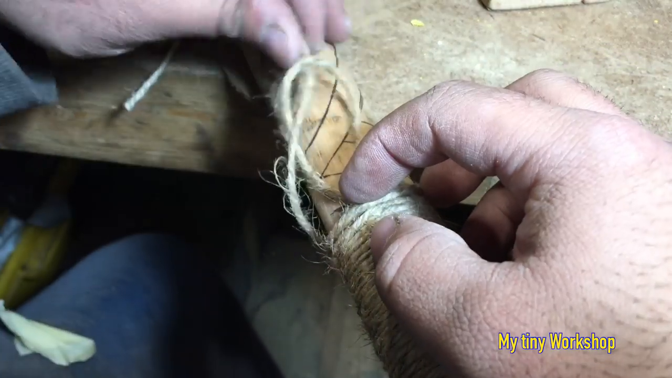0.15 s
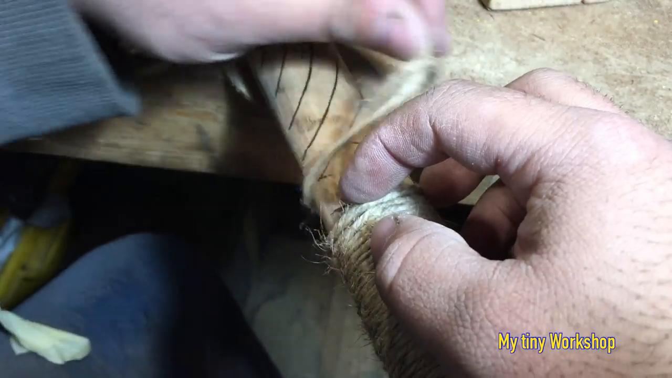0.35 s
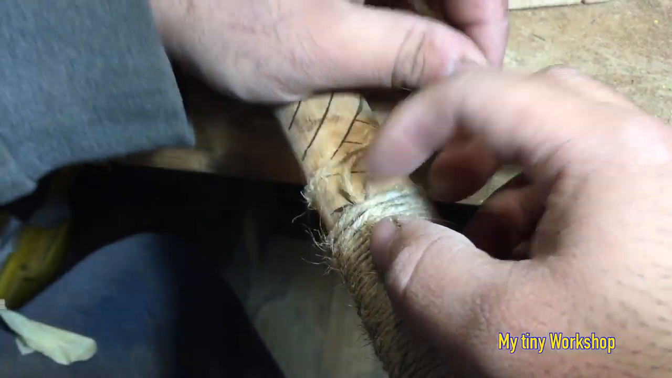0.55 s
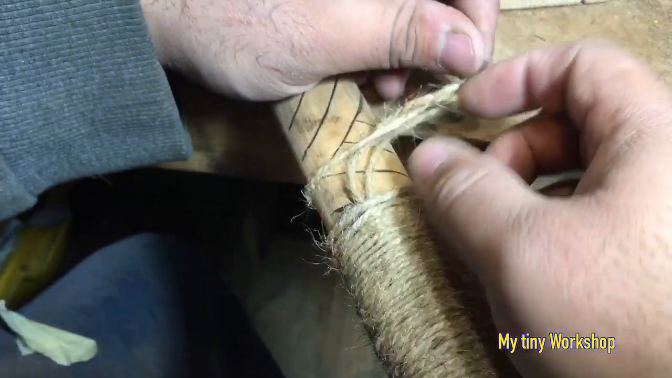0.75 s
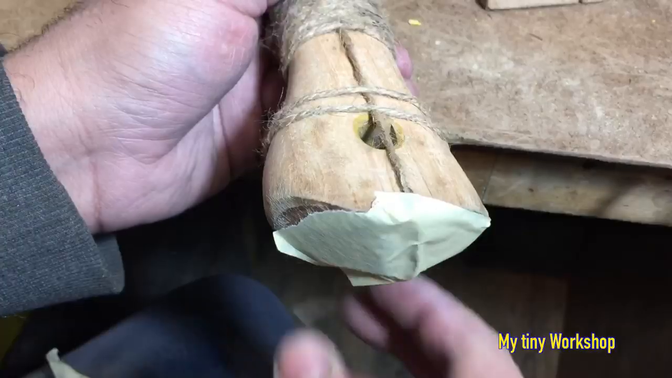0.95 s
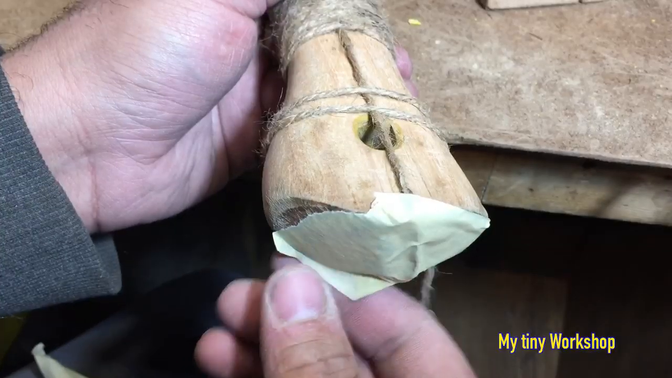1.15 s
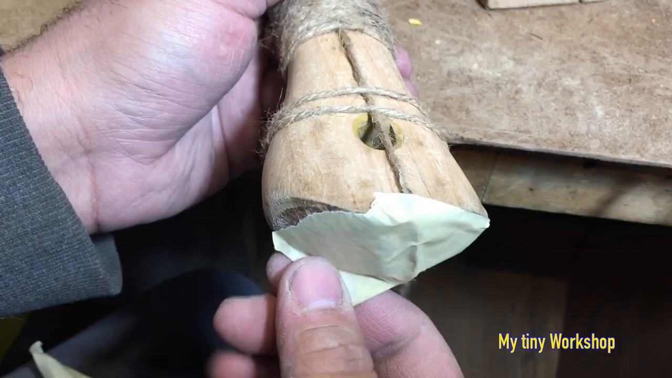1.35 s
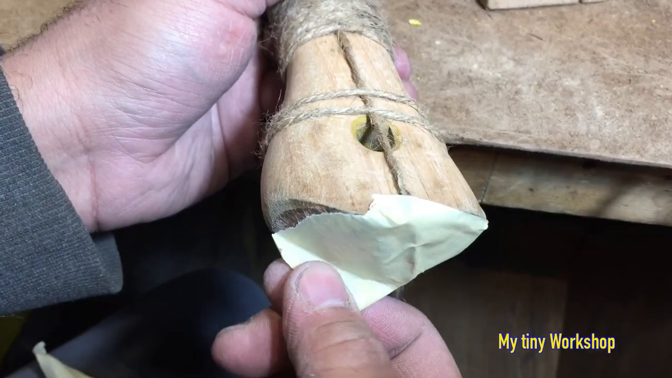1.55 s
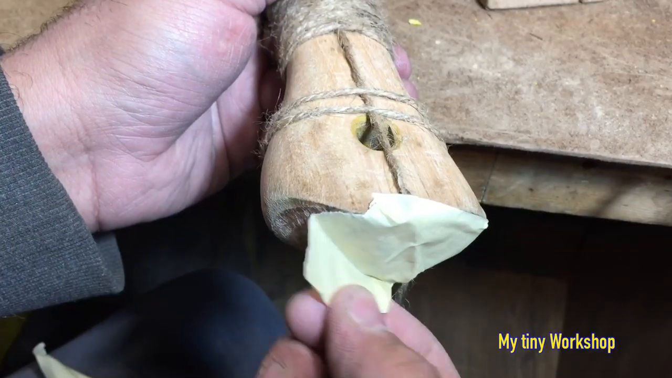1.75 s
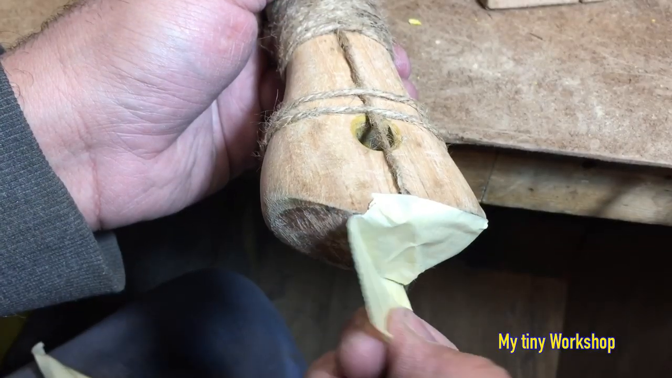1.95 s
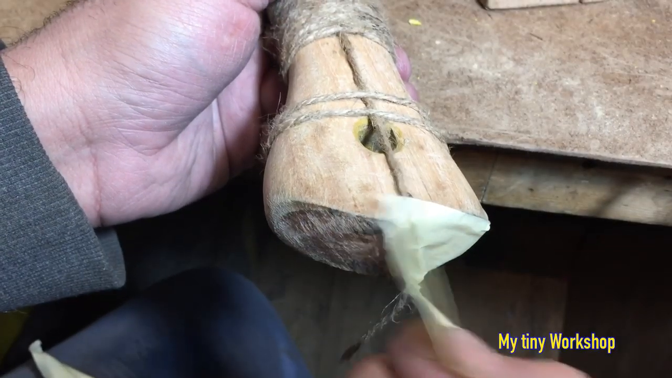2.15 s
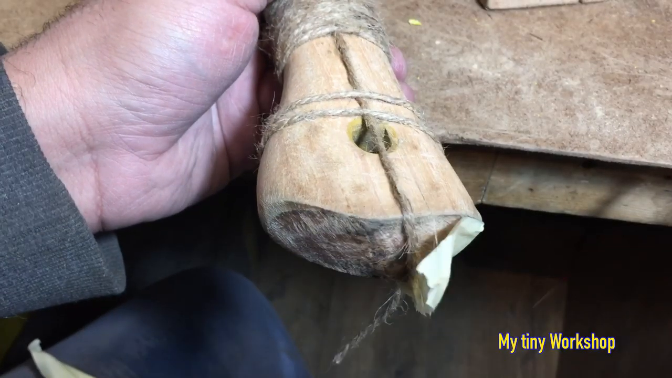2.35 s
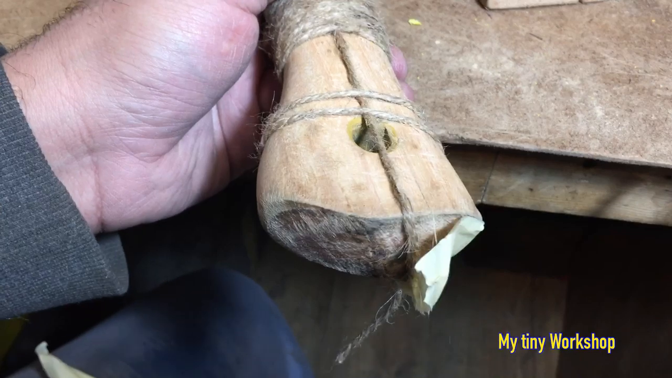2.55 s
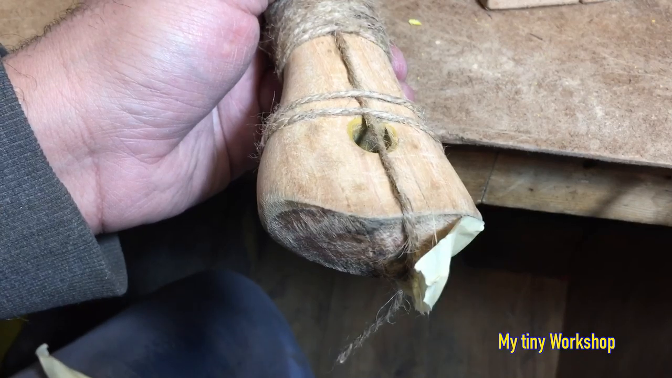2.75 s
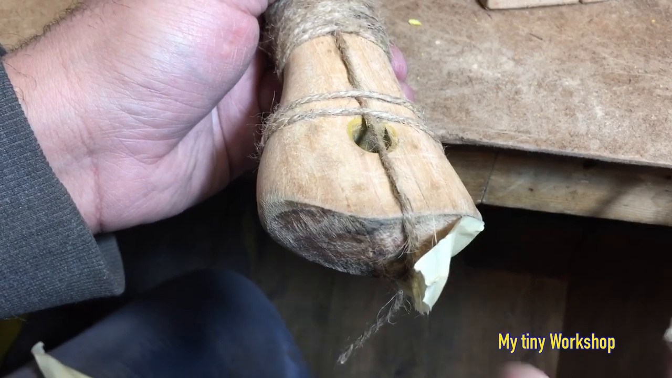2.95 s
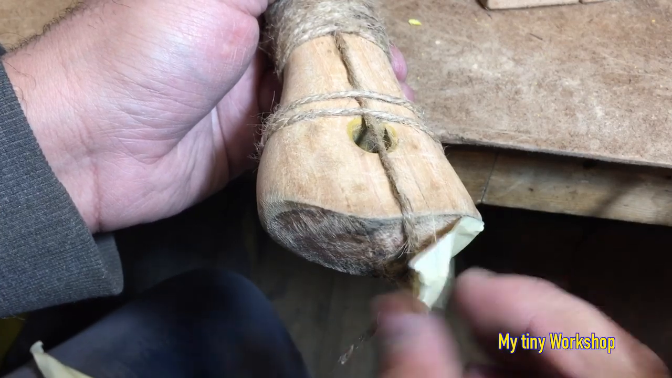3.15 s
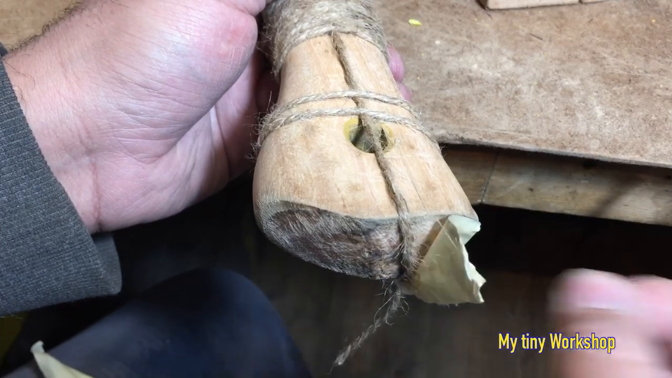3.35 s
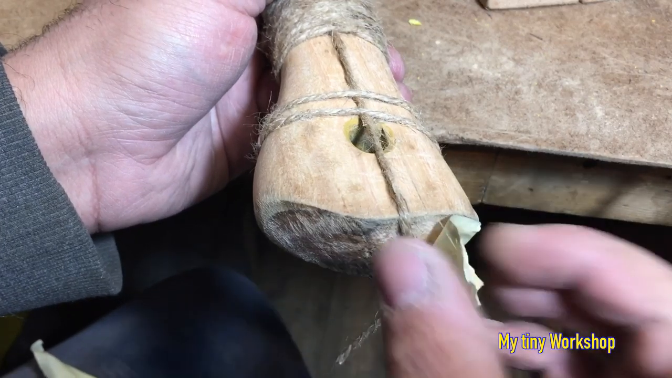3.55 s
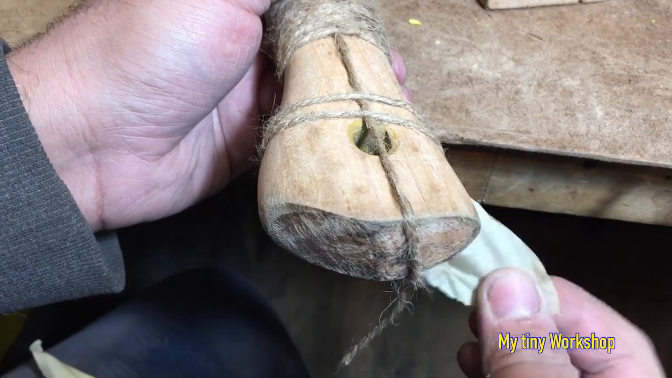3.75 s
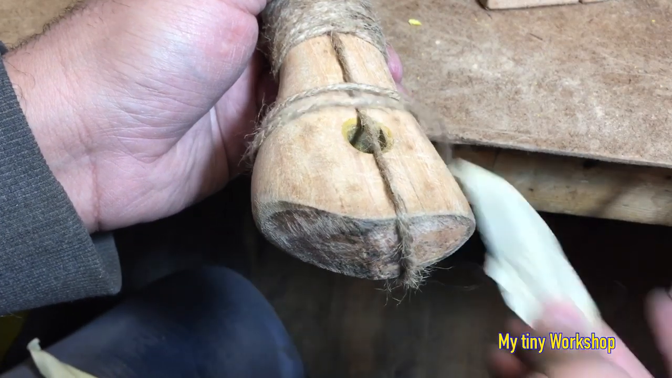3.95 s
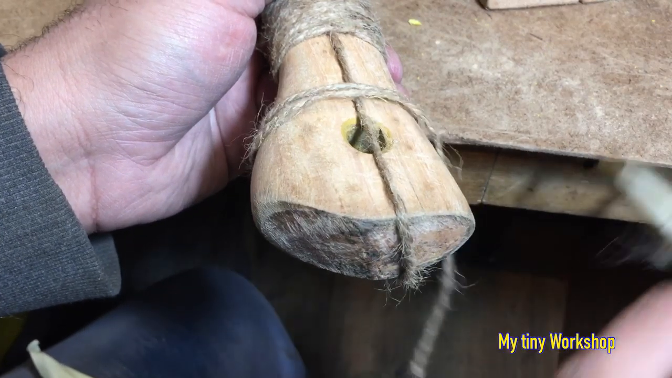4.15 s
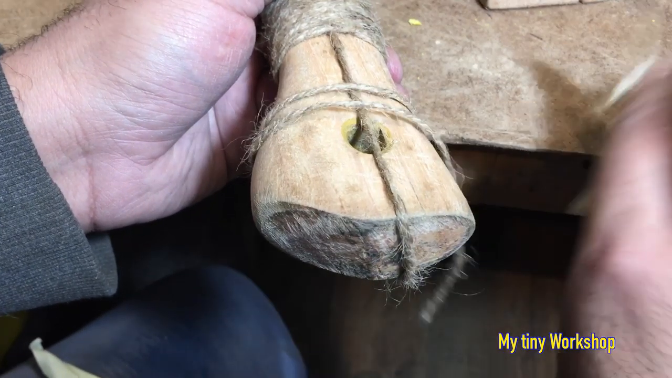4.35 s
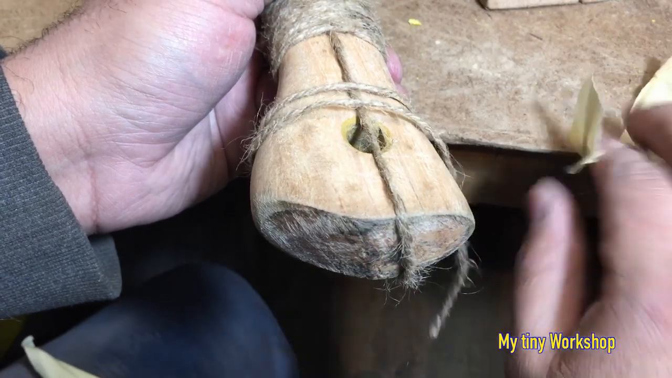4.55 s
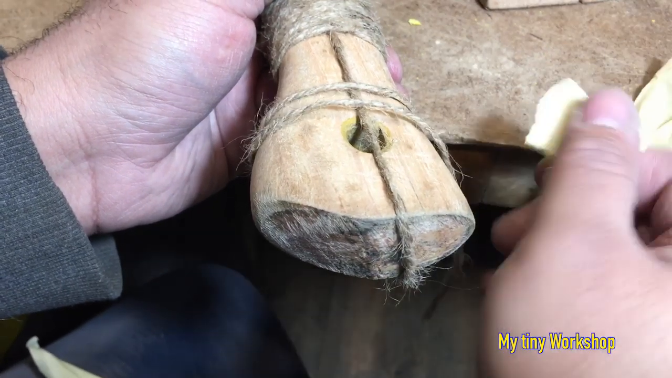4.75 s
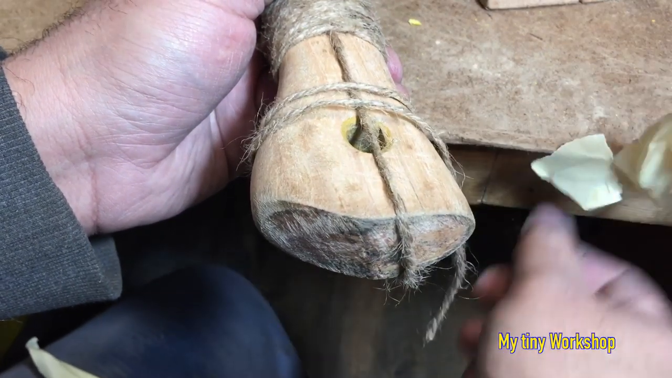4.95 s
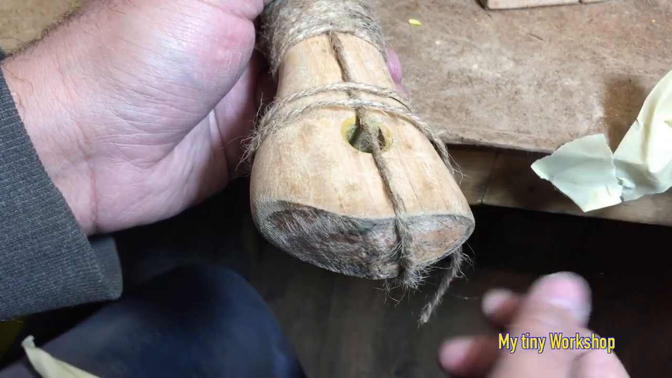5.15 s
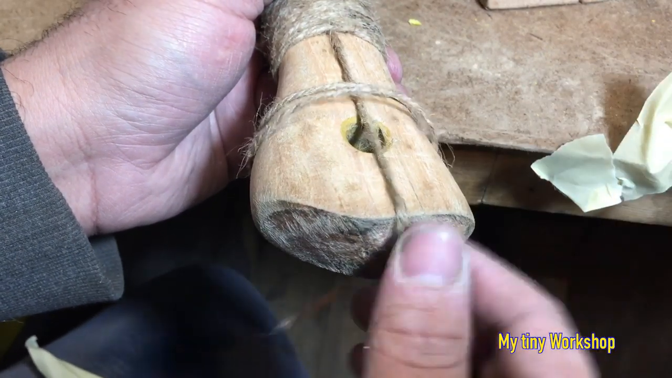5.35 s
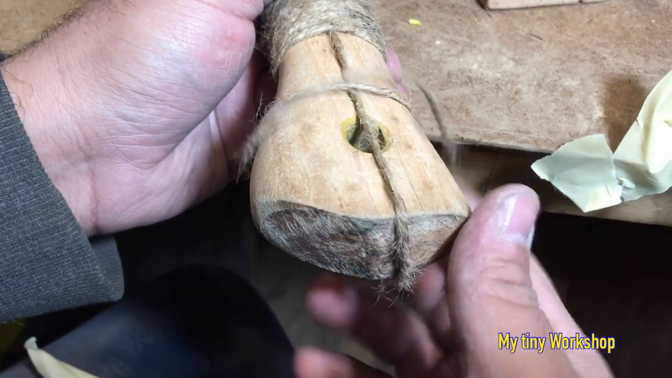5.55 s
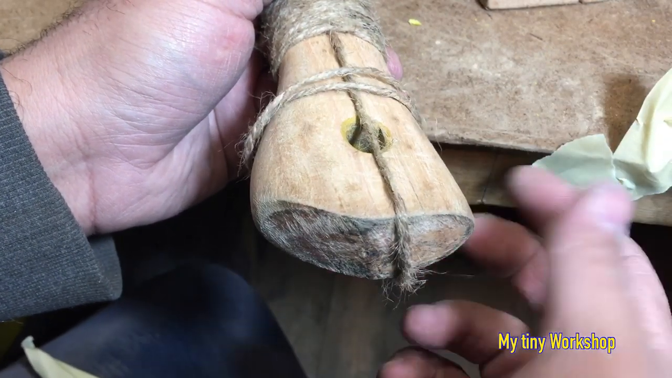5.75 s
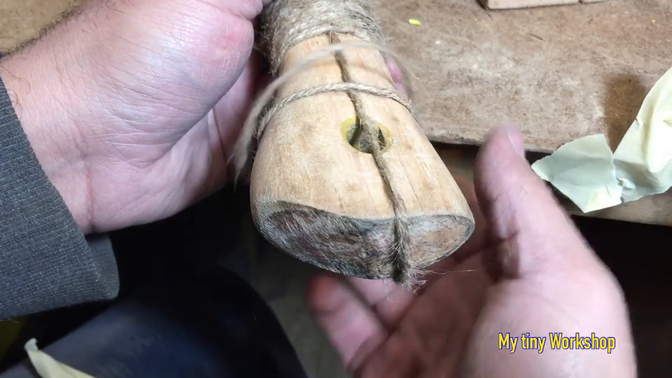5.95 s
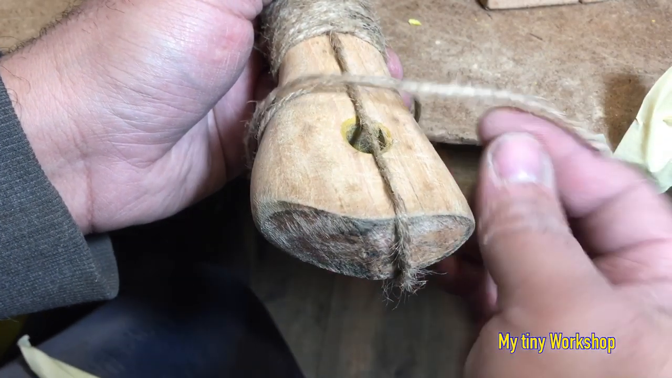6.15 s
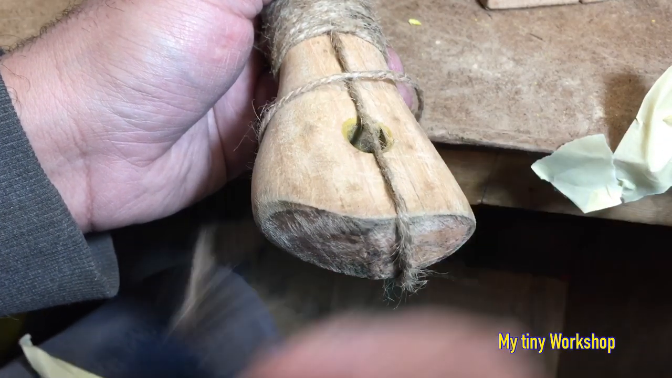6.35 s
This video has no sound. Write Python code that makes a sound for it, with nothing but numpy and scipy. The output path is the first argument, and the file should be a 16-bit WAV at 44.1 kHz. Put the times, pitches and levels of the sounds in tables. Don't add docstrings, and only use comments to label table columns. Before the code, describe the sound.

A small, quiet, dry workshop heard very close, with only very faint low room noise at first. Around 0.9 s there is a barely audible touch; a small crackle at 1.2 s and tiny high fingernail clicks at 1.5-1.6 s follow. From 1.7 to 2.2 s masking tape lifts from a wooden handle in light, grainy, sticky tugs, swelling into a loud, bright, snapping rip at 2.3-2.4 s that stops abruptly. A short weaker zip comes at 2.9 s, small crackles at 3.3-3.4 s, then a fierce tear of the leftover scrap at 3.7-3.85 s, with a last snap and soft low bench thump near 4.0 s. A tiny tick at 4.2 s precedes papery pressing and a metal tool knocking at 4.45 and 4.57 s, loudest at 4.63 s, rattling to 4.75 s. A brief weak crackling tug follows at 4.9-5.05 s, then near silence with faint ticks and light bumps at 5.6-5.7 and 6.04 s.

```python
import sys
import numpy as np
from scipy import signal
from scipy.io import wavfile
from scipy.ndimage import uniform_filter1d

SR = 44100
rng = np.random.default_rng(int(sys.argv[2]) if len(sys.argv) > 2 else 0)


def unload_wav(signal):
    wavfile.write(
        sys.argv[1],
        SR,
        np.round(np.clip(np.atleast_2d(signal).T, -1, 1) * 32767).astype(np.int16),
    )


def amplitude_ratio(level_db):
    exponent = np.asarray(level_db, float) / 20
    return 10 ** exponent


N = 281799

# freq_hz, density_db [dB per Hz]
HUSH_SPECTRUM = [(15, -52), (25, -21.5), (70, -2), (166, -7.5), (317, -13), (363, -11.5), (416, -19),
                 (607, -18.5), (1130, -19), (6380, -26), (16000, -32.5)]
HUSH_LEVEL_DB = -68.5

# peak_s, tape_level_db, climb_20db_s, drop_20db_s, wood_share_db
JERKS = [(.69, -74.5, .12, .14, 3), (1.197, -52, .014, .05, 5), (1.709, -52, .02, .075, 3),
         (1.695, -51, .03, .03, -25), (1.819, -49, .01, .1, -3), (2.016, -52, .015, .09, -1),
         (2.068, -53, .05, .08, -7), (2.12, -47.5, .03, .06, -9), (2.268, -38, .007, .05, -5),
         (2.328, -33, .02, .08, -5), (2.53, -56, .127, .085, -6), (2.882, -38, .028, .06, -21),
         (2.85, -58, .015, .05, -22), (2.869, -43, .007, .05, -19), (2.909, -53, .03, .012, -4),
         (2.983, -60, .06, .022, -11), (3.25, -54, .014, .06, -6), (3.375, -43, .02, .016, -9),
         (3.684, -39, .008, .014, 0), (3.733, -38, .035, .025, -16), (3.708, -42, .01, .03, -18),
         (3.77, -32, .022, .025, -6), (3.8, -35, .012, .06, -8), (3.831, -38, .08, .04, 2),
         (4.921, -50, .025, .07, 5), (4.977, -49, .008, .06, 8), (5.001, -35.5, .017, .013, -8),
         (5.408, -73, .035, .03, -2)]
# start_s, length_s, start_level_db, end_level_db, wood_share_db
DRAGS = [(.838, .045, -69, -70, -15), (.89, .075, -70, -78, 9), (1.23, .046, -61, -55.5, -4),
         (1.45, .07, -82, -81, -1), (1.589, .085, -69.5, -66, -8), (1.77, .04, -61, -57, -6),
         (1.865, .07, -57, -58, -1), (1.945, .04, -60, -57, -9), (2.236, .024, -60, -56, -14),
         (2.15, .06, -56, -62, -10), (2.357, .044, -26, -23.5, -10), (2.347, .008, -34, -34, -18),
         (2.413, .045, -45, -66, -6), (2.65, .105, -72, -66, -12), (3.27, .07, -61, -59, 4),
         (3.344, .026, -51, -51, 2), (3.24, .018, -64, -57, -8), (3.67, .012, -52, -42, -16),
         (3.778, .016, -43, -41, -4), (4.413, .006, -60, -58, 0), (6.034, .012, -72, -69, 9),
         (3.856, .045, -47, -55, 3), (3.9, .06, -57, -50, 0), (3.972, .027, -36, -34.5, 3),
         (4.012, .07, -48, -80, -2), (4.422, .022, -46, -52, -2), (4.454, .041, -38, -41.5, 2),
         (4.5, .06, -48, -74, 11), (4.592, .033, -42.5, -49, -3), (5.018, .04, -58, -80, 2),
         (5.7, .068, -83, -77.5, 4)]
DRAG_CLIMB_S, DRAG_DROP_S = .012, .014
# start_s, flap_ring_hz, slip_spread_db
GRIPS = [(0, 2100, 1.5), (.87, 1200, 1.5), (1.22, 1900, 1.2), (1.44, 2100, 3.5), (1.6, 2100, 3.5),
         (1.69, 950, 2.5), (1.77, 1600, 2.2), (1.86, 1600, 3.3), (2.0, 1900, 3.2), (2.11, 1720, 2.4),
         (2.25, 2300, 2), (2.32, 1800, 2.2), (2.38, 2400, 2.2), (2.47, 3300, 2), (2.62, 3300, 2),
         (2.73, 2300, 2), (2.8, 2300, 1.4), (2.95, 2700, 1.4), (3.2, 2100, 1.4), (3.275, 2300, 1.8),
         (3.325, 3100, 2), (3.64, 1400, 1.8), (3.7, 3300, 1.8), (3.81, 1120, 2), (4.47, 2500, 2),
         (4.515, 1250, 2), (4.85, 2000, 1.8), (4.96, 2900, 1.6), (5.012, 1500, 2), (5.2, 2900, 2)]
GRIP_FIZZ_DB = [1, -4, -2, 12, -2, -1, 0, -5, -6, 2, -1, -2, -4, 0, -12, 3, 1, 6, -4, 1, -5, 2, 1, -2, -8,
                -3, 1, 6, 0, 2]
SLIPS_PER_S, CLUMP_SHARE, FLAP_WIDTH_HZ = 5000, .5, 380
PATCH_DB, PATCH_S = 2.5, .04

# freq_hz, width_hz, level_db
WOOD = [(850, 340, -13), (1400, 1700, -1.5), (2400, 2700, -3.5)]
# freq_hz, width_hz, level_db
TAPE = [(3300, 1500, -4), (4100, 500, -1), (5000, 900, -3.5), (5900, 700, -1.5), (6800, 550, .5),
        (7600, 2000, -4)]
# freq_hz, width_hz, level_db
FIZZ = [(8750, 600, -0.5), (9700, 1200, 1), (11870, 2500, -1), (14300, 1700, -3.5)]

# start_s, peak_db, pitch_hz
PICKS = [
    (.8729, -52, 12300),
    (1.4712, -39, 13000),
    (1.4736, -48, 14600),
    (1.484, -51, 12000),
    (1.49, -44, 13500),
    (1.5738, -49, 12500),
    (1.5855, -38.5, 11800),
    (1.589, -47, 12000),
    (1.594, -47, 11500),
]
# start_s, level_db, pitch_hz, t60_s
TWINE_TICKS = [
    (.925, -58, 2870, 0.11),
    (4.2391, -40.5, 2400, 0.0057),
    (5.604, -47.5, 1700, 0.017),
    (6.037, -49, 594, 0.063),
    (6.04, -58.5, 1680, 0.15),
]

# start_s, peak_db, floor_boom_share_db, top_board_share_db, top_board_hz
THUMPS = [(1.189, -64, -23, 14.5, 355), (1.833, -48, -9, -7, 304), (1.869, -52, -27, -1, 248),
          (2.084, -56, -10, -14, 264), (2.13, -56.5, -9.5, -4, 312), (2.28, -39.5, -11.5, -20, 240),
          (2.358, -42.5, -17.5, -1, 315), (2.379, -47.5, -20, 7, 353), (3.253, -56.5, -24, -4, 231),
          (3.368, -66, 12, -6, 250), (3.686, -42, -12, -4, 264), (3.829, -41, -6, 2, 331),
          (3.845, -46, -10, 10, 335), (3.991, -33, -20, -2.5, 347), (4.451, -34.5, -14, 7, 250.6),
          (4.473, -37.5, 1.5, 5, 258), (4.589, -46, 5.5, 4.5, 301), (4.632, -31, -2, 6, 284),
          (4.661, -34.5, -3.5, -2.5, 324), (4.706, -35.5, -10.5, -2.5, 285), (4.92, -48.5, -9, 6, 231),
          (4.999, -35, -22, -3, 300), (5.655, -68, 12, -4, 250), (5.709, -53.5, -16, -11, 248),
          (6.034, -41, -31.5, -19.5, 280)]
# freq_hz, t60_s, rise_s
BENCH = [
    (151.1, 0.19, 0.011),
    (66.65, 0.2, 0.016),
    (464, 0.078, 0.0071),
]

# start_s, peak_db,
# dull_ring_hz, dull_over_bright_db
SNAPS = [(1.1939, -27, 1330, -1), (1.1965, -31, 2200, 6), (1.6883, -29.5, 3220, -13),
         (1.6978, -36, 4300, -10), (1.7036, -29, 3400, -16), (1.8166, -22, 1940, -4),
         (1.8288, -34, 1650, 11), (1.8428, -30, 1610, -14), (1.8598, -25, 1560, -2),
         (1.8702, -30, 1100, -12), (1.888, -29, 1570, -5), (2.0125, -38, 3400, 5), (2.0644, -34, 4170, -2),
         (2.1465, -28.5, 2800, -15), (2.1997, -37, 4140, -12), (2.2778, -13.5, 3950, -8.5),
         (2.308, -28, 1972, -4.5), (2.314, -21, 2143, -3), (2.3243, -17, 3300, 15),
         (2.3587, -10.5, 1772, -9), (2.3628, -3, 3540, -12), (2.3977, -5, 4400, -10),
         (3.2667, -22, 2300, 30), (3.2665, -30, 1200, 30), (3.2666, -21, 3200, 30),
               (3.377, -25.5, 1590, -20), (3.7057, -21, 4180, -7), (3.717, -11, 3820, -30),
               (3.7244, -8, 1627, -30), (3.737, -16, 3630, 3), (3.744, -17, 4500, -8),
               (3.7566, -13, 4400, 0), (3.7615, -17, 4400, -7), (3.7704, -4, 3400, 3),
               (3.8027, -7.5, 3400, -4.5), (3.822, -13.5, 3200, 0), (3.8283, -13, 3400, -5),
               (3.8334, -3, 1500, -8), (3.865, -24, 1630, 5.5), (3.8982, -29, 2900, 6),
               (3.9926, -13, 3740, -15), (3.9809, -15, 4500, 3), (4.0007, -14, 3600, -2),
               (4.4098, -36.5, 4560, 14), (4.61, -22.5, 2600, -1.5), (4.9055, -31, 2460, 7),
               (4.9317, -29, 1890, 0), (4.9444, -21, 4100, -3), (4.9758, -20, 2880, 4),
               (5.035, -37.5, 4160, 11),
         (1.6784, -43, 3190.0, -3.0), (1.6821, -44, 3270.0, -13.0), (1.6859, -41, 3190.0, -19.0),
         (1.6928, -37, 4570.0, -10.0), (1.7383, -41, 2800.0, -9.0), (1.7451, -42, 3360.0, -10.0),
         (1.7489, -40, 4570.0, -14.0), (1.7644, -44, 4350.0, -8.0), (1.7715, -41, 1380.0, -13.0),
         (1.7736, -40, 4570.0, -11.0), (1.784, -43, 3270.0, -6.0), (1.8308, -31, 1640.0, 6.0),
         (1.8609, -36, 1380.0, 3.0), (1.9685, -39, 3830.0, -3.0), (1.9837, -43, 4050.0, -1.0),
         (2.0025, -45, 1550.0, -14.0), (2.0055, -41, 4480.0, -15.0), (2.0141, -36, 3400.0, 2.0),
         (2.0715, -39, 3790.0, 1.0), (2.0996, -40, 3920.0, -10.0), (2.1173, -30, 4570.0, -20.0),
         (2.1366, -31, 4130.0, -4.0), (2.1591, -39, 3060.0, -11.0), (2.1639, -40, 4310.0, -20.0),
         (2.1764, -40, 4570.0, -22.0), (2.1942, -41, 1680.0, -20.0), (2.1961, -40, 4570.0, -20.0),
         (2.2367, -42, 4050.0, -10.0), (2.24, -40, 2580.0, -23.0), (2.2713, -24, 2370.0, -8.0),
         (2.2972, -29, 2410.0, -4.0), (2.3203, -22, 1380.0, -15.0), (2.3227, -22, 3920.0, -6.0),
         (2.3277, -18, 2500.0, -8.0), (2.3482, -17, 2070.0, -7.0), (2.3698, -11, 1340.0, -11.0),
         (2.3753, -11, 1080.0, -14.0), (2.3776, -10, 3320.0, -12.0), (2.3861, -13, 2110.0, -3.0),
         (2.3885, -12, 2890.0, -7.0), (2.3931, -12, 4570.0, -9.0), (2.3944, -12, 4440.0, -12.0),
         (2.4003, -11, 4520.0, -9.0), (2.4029, -14, 4570.0, -9.0), (2.8676, -27, 4180.0, -18.0),
         (2.8919, -24, 2670.0, -14.0),
         (3.3162, -39, 1590.0, -9.0), (3.3754, -29, 1120.0, -10.0), (3.6646, -43, 4570.0, -9.0),
               (3.6713, -35, 2280.0, -3.0), (3.6903, -26, 1380.0, -18.0), (3.7016, -29, 3750.0, -9.0),
               (3.7071, -23, 1980.0, -15.0), (3.7097, -26, 2760.0, -15.0), (3.7149, -26, 3920.0, -13.0),
               (3.7193, -23, 3700.0, -13.0), (3.7221, -25, 3700.0, -9.0), (3.7262, -17, 4570.0, -13.0),
               (3.7321, -17, 3490.0, -12.0), (3.7389, -20, 4570.0, -17.0), (3.7411, -23, 2280.0, -9.0),
               (3.7453, -28, 4570.0, -13.0), (3.7521, -29, 3830.0, -14.0), (3.7534, -28, 2370.0, -10.0),
               (3.7577, -27, 4570.0, -2.0), (3.7628, -24, 4570.0, -8.0), (3.7657, -22, 4480.0, -11.0),
               (3.773, -12, 3750.0, -3.0), (3.7771, -22, 2280.0, -4.0), (3.7797, -23, 3570.0, -5.0),
               (3.7891, -21, 3490.0, -3.0), (3.791, -22, 2370.0, -3.0), (3.7966, -17, 3270.0, -9.0),
               (3.7988, -12, 3360.0, -8.0), (3.8348, -20, 1850.0, 3.0), (3.8862, -33, 1210.0, 1.0),
               (3.9483, -34, 1550.0, -12.0), (3.9719, -21, 2840.0, -3.0), (3.9755, -17, 1120.0, -2.0),
               (3.9944, -20, 1210.0, 0.0), (4.4227, -33, 1030.0, -5.0), (4.4922, -24, 1720.0, 8.0),
               (4.4948, -23, 2020.0, 2.0), (4.909, -34, 2070.0, 16.0), (4.92, -28, 1290.0, -2.0),
               (4.9252, -30, 2020.0, 11.0), (4.9482, -36, 1420.0, 2.0), (4.9725, -33, 4570.0, -16.0),
               (4.9773, -30, 1720.0, 5.0), (5.0012, -24, 3830.0, -11.0), (5.0034, -21, 3100.0, -11.0),
               (5.009, -28, 4130.0, 1.0)]
BRIGHT_HZ, BRIGHT_SPREAD_OCTAVES = 6400, .4
THIN_DB_PER_OCTAVE = 70
REBOUND = .35

# start_s, peak_db, brightness_db_per_octave, edge [0 flat to 1 on edge], chatter_share_db
KNOCKS = [
    (4.4475, -22, -5, 0.18, -10),
    (4.5722, -18.5, -2.5, 0.051, -12),
    (4.6308, -5, -1.1, 0.83, -20),
    (4.641, -30.5, -18.5, 0.4, -20),
    (4.7037, -14, -1, 0.028, -14),
    (4.72, -21, -3.5, .3, 0),
    (4.743, -27, -4, 0.15, 4),
]
# freq_hz, flat_level_db, edge_level_db, t60_s
TOOL = [(1093, -14, -10.5, 0.044), (1224, -9, -5.5, 0.044), (2110, -11, -18, .08), (2715, -1, -20.5, 0.04),
        (3380, -4, -8, 0.055), (5400, -3, -12, 0.05), (4150, -5, -23, 0.08), (4620, -15, -20.5, .14),
        (5800, -10, 11.5, 0.02), (5740, -7, -7.5, 0.13), (7950, -22, -19, .09), (9200, -9.5, -14, 0.045),
        (9720, -24, -5, .11), (10860, -18.5, -29, .06)]
CHATTER_T60_S = .03
CLATTER_COUNT, CLATTER_DB, CLATTER_T60_S = 36, -23, .05

# freq_hz, width_hz, depth [0-1]
NOTCHES = [(4900, 130, 0.1), (10130, 550, 0.3)]
EDGE_HZ = 15900


def evened(x):
    return x / np.sqrt(np.mean(x ** 2) + 1e-20)


def add(mix, start_s, sound):
    part = mix[round(start_s * SR):][:len(sound)]
    part += sound[:len(part)]


def smooth_twice(x, span, axis=-1):
    return uniform_filter1d(uniform_filter1d(x, span, axis), span, axis)


def resonate(x, hz, width):
    return signal.lfilter(*signal.iirpeak(hz, hz / width, SR), x)


def follow(x, hz, width):
    turn = np.exp(2j * np.pi * np.cumsum(hz) / SR)
    r = np.exp(-np.pi * width / SR)
    baseband = signal.lfilter([(1 - r) ** 2], [1, -2 * r, r * r], x / turn + 1e-18)
    return 2 * (turn * baseband).real


def ring(hz, t60, rise, turn=0):
    t = np.arange(int(t60 * SR) + 9) / SR
    return (1 - np.exp(-t / rise)) * amplitude_ratio(-60 * t / t60) * np.sin(2 * np.pi * (hz * t + turn))


def hush():
    frames, hz = N // 256 + 5, np.fft.rfftfreq(1024, 1 / SR)
    real, imaginary, patches = rng.standard_normal((frames, 513, 3)).T
    patches = evened(uniform_filter1d(uniform_filter1d(patches, 10, 0), 14, 1))
    f, db = np.transpose(HUSH_SPECTRUM)
    field_db = np.interp(np.log(hz + 1), np.log(f), db)[:, None] + 1.2 * patches
    spectra = (real + 1j * imaginary) * amplitude_ratio(field_db)
    noise = signal.istft(spectra, nperseg=1024, noverlap=768)[1][:N]
    return amplitude_ratio(HUSH_LEVEL_DB) * evened(noise)


def pull():
    t, power = np.arange(N) / SR, np.full((2, N), 1e-12)
    moves = [(s, 0, db, db, wood_db, climb, drop) for s, db, climb, drop, wood_db in JERKS]
    moves += [(*row, DRAG_CLIMB_S, DRAG_DROP_S) for row in DRAGS]
    for s, length, start_db, end_db, wood_db, climb, drop in moves:
        corners = [s - 3 * climb, s, s + length + 1e-6, s + length + 3 * drop]
        on = slice(round(corners[0] * SR), round(corners[-1] * SR))
        db = np.interp(t[on], corners, [start_db - 60, start_db, end_db, end_db - 60])
        power[:, on] += amplitude_ratio(2 * (db + np.array([[0], [wood_db]])))
    return np.sqrt(power)


def body(slips, level, modes):
    patches = evened(smooth_twice(rng.standard_normal((len(modes), N)), round(PATCH_S * SR)))
    drives = slips * rng.standard_normal((len(modes), N)) * amplitude_ratio(PATCH_DB * patches)
    steady, played = np.zeros(N), np.zeros(N)
    for drive, (hz, width, db) in zip(drives, modes):
        steady += amplitude_ratio(db) * resonate(resonate(drive, hz, width), hz, width)
        played += amplitude_ratio(db) * resonate(resonate(drive * level, hz, width), hz, width)
    return played / np.std(steady)


def peel():
    tape, dull = pull()
    s, flap_hz, spread_db = np.transpose(GRIPS)
    grip = np.searchsorted(s, np.arange(N) / SR, "right") - 1
    clumps = evened(smooth_twice(rng.standard_normal(N), 60))
    size_spread = np.minimum(rng.exponential(1, N), 4) + CLUMP_SHARE * clumps
    slips = amplitude_ratio(spread_db[grip] * size_spread) * (rng.random(N) < SLIPS_PER_S / SR)
    slips /= np.sqrt(uniform_filter1d(slips ** 2, 900) + 1e-9)

    flap_ring = follow(slips * rng.standard_normal(N), flap_hz[grip], FLAP_WIDTH_HZ)
    flap = amplitude_ratio(-3) * dull * evened(flap_ring)
    bench = amplitude_ratio(-17) * body(slips, dull, [(340, 120, -1), (152, 30, -2)])
    wood = amplitude_ratio(-0.5) * body(slips, dull, WOOD)
    paper = body(slips, tape, TAPE)
    threads = body(slips, tape * amplitude_ratio(np.array(GRIP_FIZZ_DB)[grip]), FIZZ)
    return flap + bench + wood + paper + threads


def room(x):
    t = np.arange(9000) / SR
    taps = np.zeros(len(t))
    at = np.arange(60, len(t) - 20, 20)
    taps[at + rng.integers(0, 20, len(at))] = rng.choice([-1., 1.], len(at))
    low = signal.lfilter([.3], [1, -.7], taps)
    tail = low * amplitude_ratio(-60 * t / 0.18) + (taps - low) * amplitude_ratio(-60 * t / 0.084)
    return signal.fftconvolve(x, tail / np.linalg.norm(tail))[:N]


def picks():
    out = np.zeros(N)
    for s, db, hz in PICKS:
        add(out, s, amplitude_ratio(db + 7.5) * ring(hz, 0.0011, .00003))
    return out


def twine_ticks():
    out = np.zeros(N)
    for s, db, hz, t60 in TWINE_TICKS:
        add(out, s, amplitude_ratio(db) * ring(hz, t60, 0.0013))
    return out


def thumps():
    out, t = np.zeros(N), np.arange(4000) / SR
    for (s, db, boom_db, board_db, board_hz), turns in zip(THUMPS, rng.random((len(THUMPS), len(BENCH)))):
        for (hz, t60, rise), share_db, turn in zip(BENCH, (0, boom_db, board_db - 11), turns):
            mode_hz = hz * (1 + .06 * (turn - .5))
            add(out, s, amplitude_ratio(db + share_db + 4.0) * ring(mode_hz, t60, rise, turn))
        add(out, s, amplitude_ratio(db + board_db + 1.5) * ring(board_hz, 0.1, 0.0071))
        scuff = evened(resonate(resonate(rng.standard_normal(len(t)), 300, 330), 300, 330))
        add(out, s, amplitude_ratio(db + board_db - 5.5 - 60 * t / 0.13) * (1 - np.exp(-t / 0.0022)) * scuff)
    return out


def snaps():
    out, threads = np.zeros(N), SNAPS
    for (s, db, low_hz, low_db), u in zip(threads, rng.random((len(threads), 3))):
        dull = 1 / (1 + amplitude_ratio(-low_db))
        bright = 1 - dull
        octaves = BRIGHT_SPREAD_OCTAVES * (u[2] - .5) - low_db / THIN_DB_PER_OCTAVE
        high_hz = BRIGHT_HZ * 2 ** octaves
        middle_hz = np.sqrt(low_hz * high_hz)
        rebound_s = (1 + u[0]) / 1200
        for late, gain in ((0, amplitude_ratio(db)), (rebound_s, amplitude_ratio(db) * REBOUND * u[1])):
            add(out, s + late, gain * amplitude_ratio(3.5) * dull * ring(low_hz, 7.0 / low_hz, .0001))
            add(out, s + late, gain * amplitude_ratio(5.5) * bright * ring(high_hz, 8.5 / high_hz, .00005))
            add(out, s + late, gain * amplitude_ratio(-3) * bright * ring(12500, .0007, .00003))
            add(out, s + late, gain * amplitude_ratio(-1) * np.sqrt(dull) * ring(middle_hz, .0007, .00003))
    return out


def knocks():
    out, t = np.zeros(N), np.arange(3000) / SR
    small_hz = np.linspace(1000, 6400, CLATTER_COUNT) * rng.uniform(.95, 1.05, CLATTER_COUNT)
    for s, db, tilt_db, edge, chatter_db in KNOCKS:
        rings = np.zeros(7000)
        for hz, flat_db, edge_db, t60 in TOOL:
            t60 = min(t60, .14)
            mode_db = flat_db + (edge_db - flat_db) * np.clip(edge, 0, 1)
            gain = amplitude_ratio(db - 14 + mode_db + tilt_db * np.log2(hz / 3000))
            add(rings, 0, gain * ring(hz, t60, .0002, rng.random()))
            twin_hz = hz * rng.uniform(0.95, 1.03)
            add(rings, 0, 1.2 * gain * ring(twin_hz, .7 * t60, 0.00013, rng.random()))
        for hz, (size, turn) in zip(small_hz, rng.random((CLATTER_COUNT, 2))):
            gain = amplitude_ratio(db + CLATTER_DB - 12 * size - 5 * edge + (tilt_db - 1.5) * np.log2(hz / 3000))
            add(rings, 0, gain * ring(hz, CLATTER_T60_S * (1 + turn), .0003, turn))

        taps = rng.standard_normal(len(t)) * (rng.random(len(t)) < .03) * amplitude_ratio(-60 * t / CHATTER_T60_S)
        chatter = signal.fftconvolve(rings, taps / np.linalg.norm(taps))[:len(rings)]
        add(out, s, rings + amplitude_ratio(chatter_db) * chatter)

        centre_hz, rise = 4500 * 2 ** (tilt_db / 4), 1 - np.exp(-t / 0.00014)
        crack, rattle = rng.standard_normal((2, len(t))) * rise
        crack = resonate(resonate(crack, centre_hz, 9000), centre_hz, 9000)
        rattle = resonate(resonate(rattle, 0.28 * centre_hz, 5040), .6 * centre_hz, 5040)
        add(out, s, amplitude_ratio(db - 8 - .25 * chatter_db - 60 * t / 0.01) * crack)
        add(out, s, amplitude_ratio(db - 16 - 60 * t / 0.19) * rattle)
    return out


def scene():
    light_parts = signal.butter(3, 800, "high", fs=SR, output="sos")
    clicks = signal.sosfilt(light_parts, picks() + twine_ticks() + snaps())
    near = peel() + clicks + knocks()
    return (near + amplitude_ratio(-19.5) * room(near) + thumps() + hush())[None]


def roll_off(x):
    return signal.sosfilt(signal.butter(12, 16840, fs=SR, output="sos"), x)


def record(dry):
    x = signal.sosfilt(signal.butter(4, 42, "high", fs=SR, output="sos"), dry)
    for hz, width, depth in NOTCHES:
        x = x - np.clip(depth, 0, 1) * resonate(x, hz, width)
    band_limit = signal.firwin(511, EDGE_HZ, window=("kaiser", 9), fs=SR)
    mix = signal.oaconvolve(x, band_limit[None], "same")
    return roll_off(mix)


dry = scene()
out = record(dry)
unload_wav(out)
```